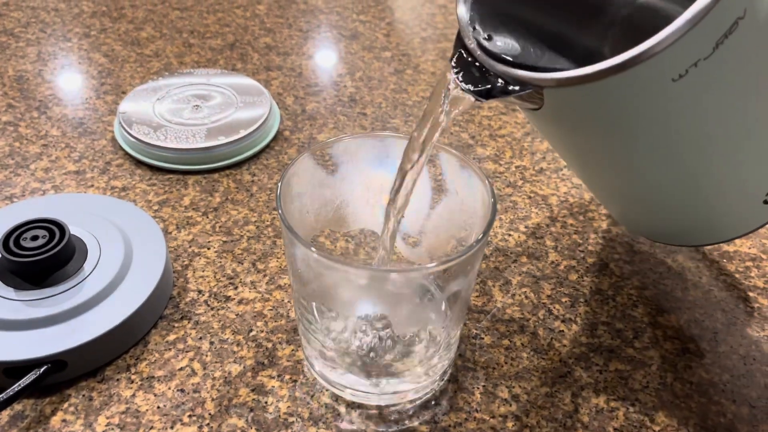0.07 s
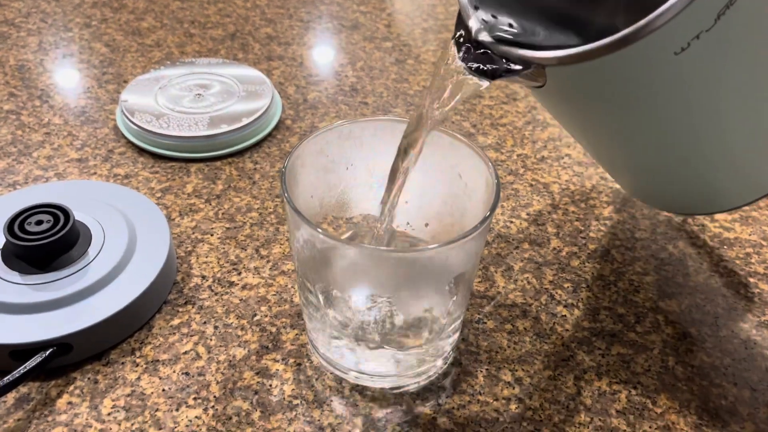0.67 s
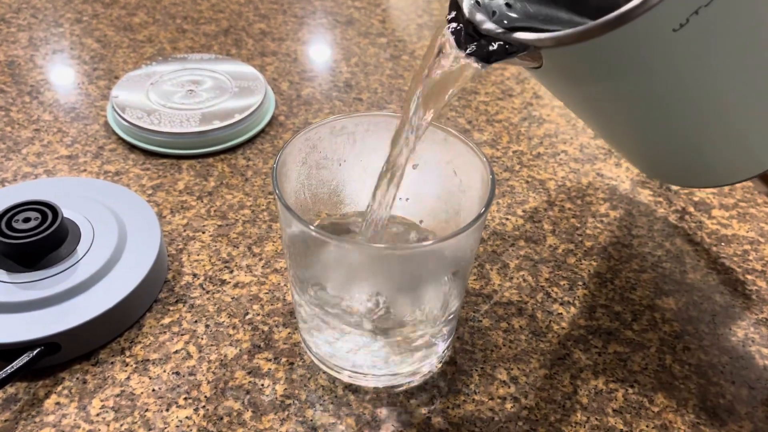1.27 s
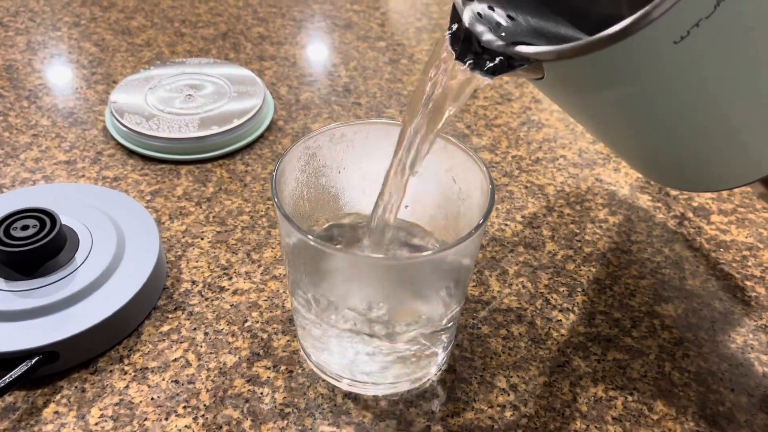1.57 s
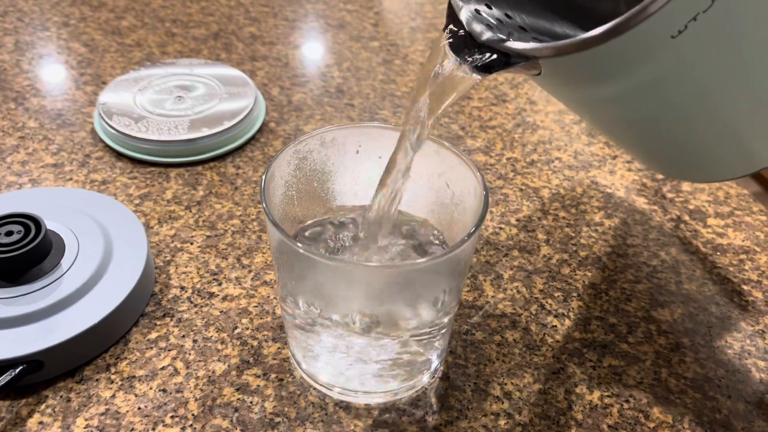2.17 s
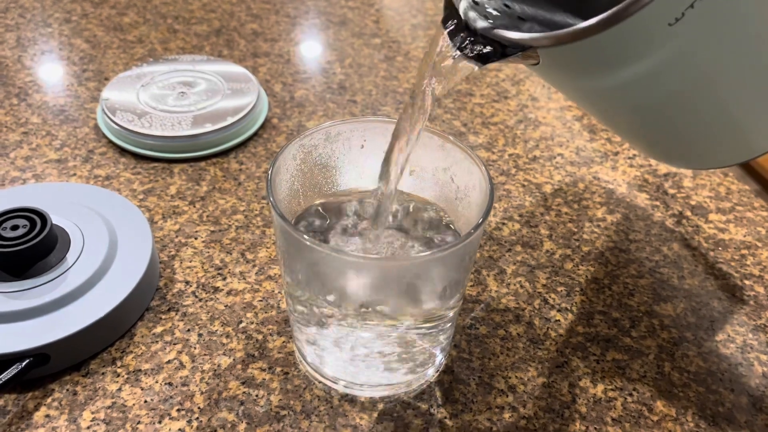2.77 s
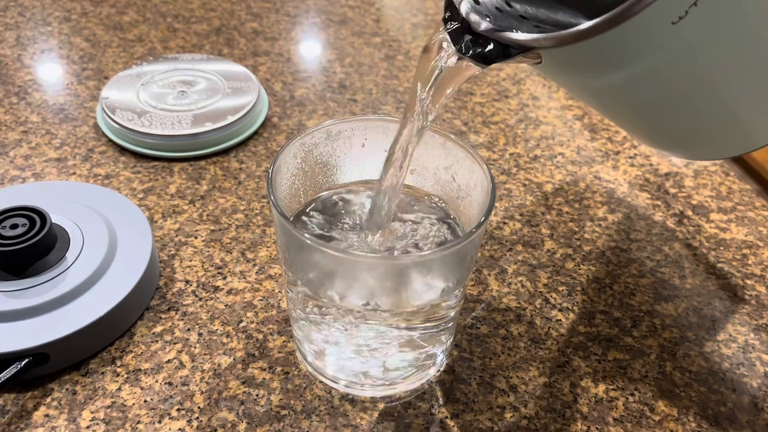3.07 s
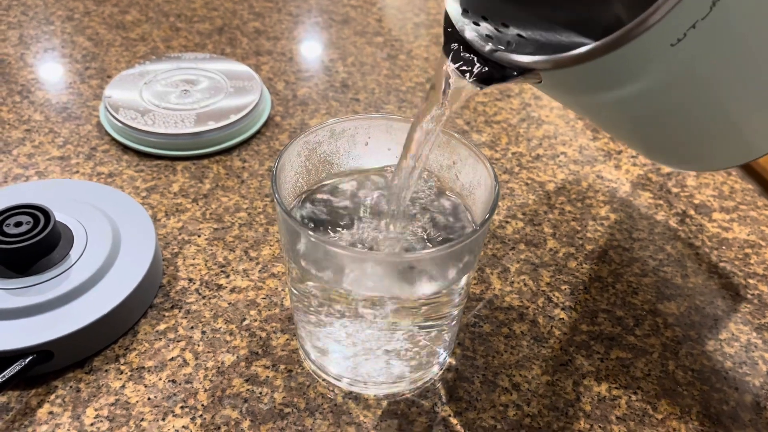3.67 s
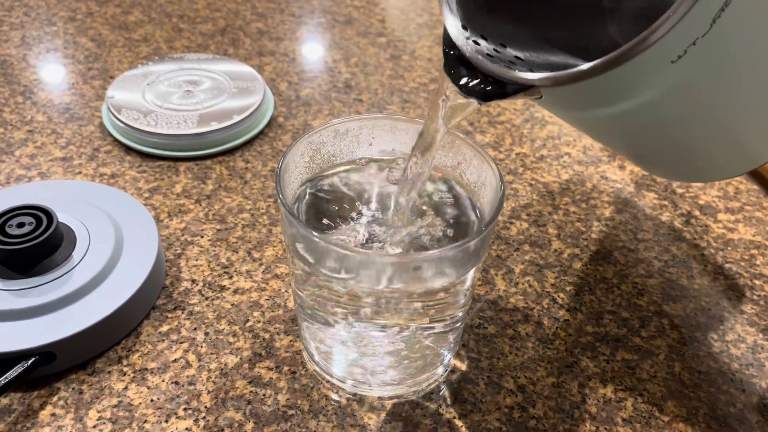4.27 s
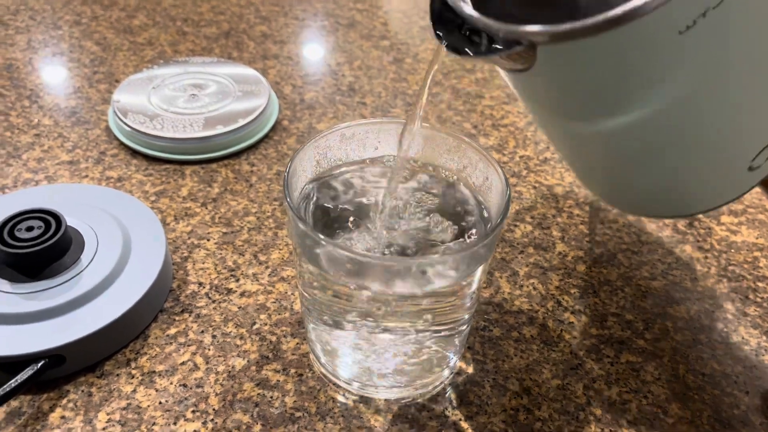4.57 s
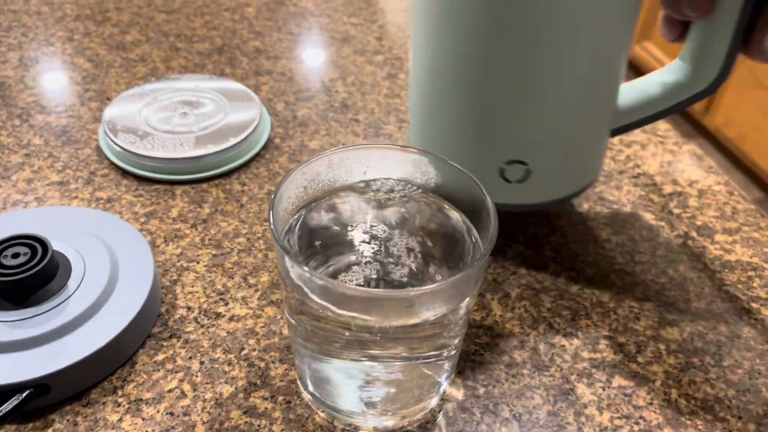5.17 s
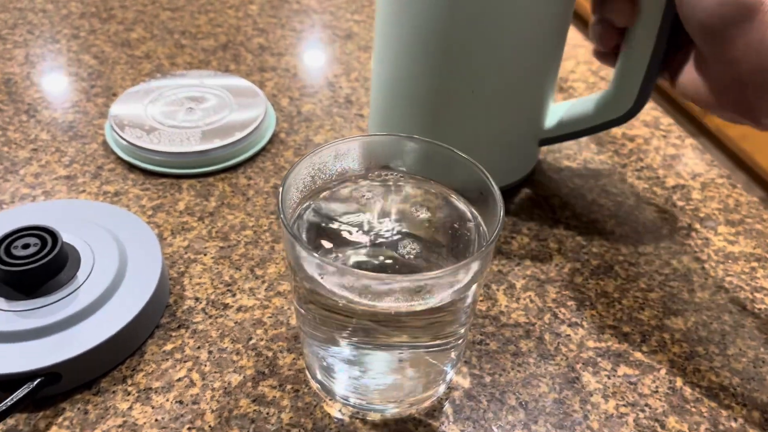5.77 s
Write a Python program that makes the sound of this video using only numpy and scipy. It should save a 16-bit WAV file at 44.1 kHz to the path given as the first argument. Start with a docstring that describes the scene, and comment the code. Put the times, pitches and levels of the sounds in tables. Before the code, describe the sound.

In a kitchen with a low hum, a close stream of hot water gurgles into a glass, with small plops, ticking droplets and a brief fizz. The pitch climbs while the flow weakens and stops. Faint steam whistles as the kettle is tilted upright. A little farther back, it is set on the stone counter with a ringing double knock, followed by a low slosh and a soft sizzle on hot metal.

```python
"""Hot water runs from an electric kettle into a glass tumbler, close by on a kitchen counter.
First the full stream pulls air under: pockets plop, bubbles patter, spray ticks, and the air column
rises in pitch as the glass fills. After 2 s foam fizzes up; the stream then thins to spurts and drips.
Past 4 s the kettle tips back with a slosh and thin whistles of steam. At 5.4 s it lands and rocks,
and the water left inside sloshes and sizzles on the hot metal. A low room hum lies under it all."""
import sys
import numpy as np
from scipy import signal
from scipy.fft import rfft, irfft
from scipy.io import wavfile

SR = 44100
rng = np.random.default_rng(int(sys.argv[2]) if len(sys.argv) > 2 else 0)


def dump(signal):
    """Clip the signal to [-1, 1] and save it as 16-bit WAV at the path in sys.argv[1]."""
    limited = np.clip(np.atleast_2d(signal).T, -1, 1)
    pcm = np.round(limited * 32767).astype(np.int16)
    wavfile.write(sys.argv[1], SR, pcm)


N = 264908
TIME, HZ = np.arange(N) / SR, np.fft.rfftfreq(N, 1 / SR)

# The featured air pockets pulled under by the stream: start_s, level_db, pitch_hz, t60_s
AIR_POCKETS = [(0.0213, -26, 1004, 0.051), (0.0508, -22.5, 2430, 0.0088), (0.1989, -14, 960, 0.028),
               (0.2309, -17.5, 970, 0.019), (0.2604, -21, 980, 0.029), (0.3481, -25, 1020, 0.023),
               (0.385, -12.5, 1010, 0.0043), (0.5085, -15, 945, 0.033), (0.4069, -18.5, 970, 0.031),
               (0.4711, -15.5, 934, .038), (0.517, -13, 928, 0.025), (0.5876, -17.5, 930, 0.0093),
               (0.6781, -9, 935, 0.0076), (0.701, -15, 1000, 0.014), (0.7284, -10.5, 940, 0.026),
               (0.7902, -17.5, 850, .011), (0.8137, -14, 486, 0.0067), (0.8368, -21.5, 970, 0.025),
               (0.8763, -8.5, 546, 0.0033), (0.9926, -17.5, 630, 0.0061), (1.0788, -11.5, 565, 0.0047),
               (1.092, -9, 487, 0.0034), (1.1118, -10, 690, 0.0067), (1.1592, -7.5, 463, 0.0061),
               (1.261, -8.5, 393, 0.0096), (1.3474, -10.5, 420, .014), (1.3628, -10.5, 516, 0.012),
               (1.4001, -11.5, 455, 0.006), (1.4673, -15.5, 370, 0.0093), (1.571, -16.5, 394, 0.018),
               (1.5987, -16.5, 1270, 0.0069), (1.483, -18.5, 1300, 0.0065), (1.5259, -21, 490, 0.019),
               (1.6255, -27, 1440, 0.0038), (1.752, -18.5, 1340, 0.0065), (1.8492, -16.5, 1340, 0.0042),
               (1.9461, -18, 1240, .005), (2.0614, -12, 1170, 0.0048), (2.123, -3, 3680, 0.001),
               (2.1514, -12.5, 1240, 0.0015), (2.1783, -13.5, 1140, 0.0029), (2.212, -20.5, 362, 0.012),
               (2.3174, -9, 1230, .003), (2.5304, -14.5, 3320, 0.0025), (2.5931, -24, 2240, 0.0035),
               (2.716, -21.5, 1300, 0.0039), (2.8826, -25, 1400, 0.021), (2.9377, -24.5, 1740, 0.02),
               (2.9477, -19, 1330, 0.011), (3.2345, -15, 1310, 0.0026), (3.261, -17, 1460, 0.0028),
               (3.4558, -18, 1290, 0.0022), (3.5946, -25, 1650, 0.0043), (3.854, -28.5, 1400, 0.0078),
               (4.2319, -36, 1820, .013), (4.3956, -28.5, 1730, .01), (4.587, -15, 1510, 0.0032),
               (4.6193, -22.5, 3780, 0.0037), (4.649, -21, 1490, 0.0072), (4.6836, -26, 2630, 0.0057)]
# The stream runs full, thins and stops: time_s, bubbling_db, spray_db
POUR_LEVELS = [(0, -52, -52.5), (0.6, -53, -54), (1.2, -52, -60.5), (1.7, -51, -63.5), (2.2, -51, -65),
               (2.6, -59, -60.5), (3.3, -58, -60.5), (4.1, -72, -59.5), (4.68, -59.5, -62),
               (4.76, -87, -66), (5.38, -76, -67)]
# Spurts in the thinning stream: start_s, end_s, boost_db
STREAM_SPURTS = [(2.783, 3.019, 7.5), (3.156, 3.242, 6), (3.504, 3.687, 10), (3.824, 3.913, 11),
                 (4.294, 4.406, 9), (4.58, 4.712, 6)]
# The air column above the water: time_s, pitch_hz, width_hz, gulps_over_column_db
AIR_COLUMN = [(0, 1013, 102, -24.5), (.8, 976, 127, -15.5), (1.1, 1020, 345, 5.5), (1.5, 1310, 355, 0),
              (2.25, 1370, 317, 2), (2.7, 1485, 363, -11), (3.7, 1580, 364, -9), (4.7, 1810, 286, -12),
              (5.4, 1610, 200, -2)]
# The featured droplets and bursting films: time_s, level_db, brightness_db
DROPLETS = [(0.175, -37.5, -7), (0.3385, -28.5, -12), (0.48, -34.5, -10), (0.578, -29, -17),
            (0.6755, -34, -45), (0.7007, -32, -5.5), (0.763, -29, -19), (0.9025, -32, -18),
            (1.043, -36, -1), (1.153, -42.5, 6), (1.261, -41, -11), (1.346, -35.5, -2), (1.4423, -36.5, -2),
            (1.6313, -42, 0), (2.061, -34.5, -9), (2.117, -33, 1), (2.151, -38.5, -1), (2.2632, -41.5, 4),
            (2.947, -39, 2), (3.259, -31.5, -8), (3.9504, -41.5, -14), (4.5121, -39, -3),
            (4.6427, -32.5, 5), (4.6775, -36, 5.5), (5.169, -44.5, -10)]
# Tone of a pocket's slap, impacts on the water, a droplet and fine spray: frequency_hz, gain_db
SLAP_EQ = [(500, -16), (1400, 13.5), (2200, 6.5), (3400, 1), (4800, -2.5), (6500, -3.5), (16000, -10.5)]
IMPACT_EQ = [(200, -29), (600, -10), (1000, 0), (2000, 5), (5000, -3)]
DROPLET_EQ = [(900, -30), (2500, -9), (5000, -7), (6800, 3.5), (8300, 6.5), (10000, 1.5), (12000, -0.5),
              (15500, 2.5), (17000, -25)]
SPRAY_EQ = [(2500, -19), (5000, 2), (6800, 10), (8300, -31), (10500, 4.5), (12500, -11), (15500, -3),
            (17000, -18)]
# The kettle lands and rocks: start_s, kettle_db, slab_db, cabinet_db, crack_db, contact_ms
LANDING_HITS = [(5.412, -10, 0.5, -56, -16, 0.11), (5.4903, 3.5, -33, -17.5, -16.5, 0.74),
                (5.5146, -31, -22, -27, -31, 0.11), (5.5257, -18, -7.5, -23.5, -27, 0.33)]
# Modes of the kettle and of the cabinet under the counter: pitch_hz, level_db, t60_s
KETTLE_MODES = [(321.5, -4.5, .12), (410, 2.5, 0.079), (468, -5.5, 0.044), (587, -4, 0.056),
                (613, -17, 0.14), (695, -5, 0.036), (865, -6.5, 0.034), (962, -17.5, 0.19),
                (1085, -16, 0.14), (1290, -22, 0.16), (1460, -16, 0.077), (1560, -2.5, 0.033),
                (1628, -21, .24), (2130, -9, 0.019), (2720, -24, 0.017), (3540, -20, 0.03),
                (4540, -26, .025)]
CABINET_MODES = [(103, 9, 0.091), (114.4, 0, 0.25), (164, -4.5, 0.43), (246, 1, 0.17)]
# Water sizzling and sloshing in the kettle: start_s, end_s, level_db, fade_s
SIZZLE_CUES = [(4.25, 5.06, -65.5, 0.13), (5.745, 6.1, -54, 0.12), (5.757, 5.768, -36, 0.022),
               (5.783, 5.799, -38, 0.024)]
SLOSH_CUES = [(4.135, 4.264, -45, 0.028), (5.73, 6.1, -40, 0.1)]
# Thin whistles of steam: start_s, end_s, first_hz, last_hz, width_hz, level_db
STEAM_CUES = [(4.2, 4.65, 4500, 4450, 650, -67), (4.62, 4.92, 4650, 4500, 200, -65),
              (4.5, 5.08, 4250, 4200, 900, -65), (4.92, 5.02, 7850, 7450, 140, -67),
              (5.66, 6.1, 6600, 6650, 400, -62), (5.8, 6.1, 4050, 4080, 350, -62)]
# Tone of the base's crack on stone, the sizzle and the slosh: frequency_hz, gain_db
CRACK_EQ = [(300, 17), (800, 20), (1300, 7.5), (1600, 13.5), (1850, -1.5), (2080, 4.5), (2380, -5.5),
            (2700, -1.5), (3100, -10), (3500, -2.5), (4800, -12), (6300, -20), (8200, -18.5),
            (11000, -31.5), (16000, -27)]
SIZZLE_EQ = [(300, 1), (900, -2), (1500, -0.5), (2300, -3), (3200, -2), (4200, -3.5), (5500, -8.5),
             (9000, -9), (11200, -4.5), (12500, -27), (16000, -21)]
SLOSH_EQ = [(30, -10), (60, -19), (115, 6), (175, -3), (240, -8), (420, -11.5), (520, -23.5), (900, -30),
            (2000, -58)]
# Stereo phase of a close source, at a depth of 1: frequency_hz, left_lead_rad
STEREO_PHASE = [(100, 0.35), (400, 0.65), (780, 0.42), (1120, 1.0), (1460, 0.72), (3360, 0.42), (4310, 1.5),
                (5000, -2.3), (5860, -2), (7920, -5.5), (10200, -6.5), (12600, -10), (15200, -11),
                (16500, -11)]
# Stereo balance of a close source, at a depth of 1: frequency_hz, left_minus_right_db
STEREO_BALANCE = [(100, -5), (400, 2.5), (700, 5), (1050, 0.5), (1300, 7), (2200, 0), (3200, 5), (4300, 6),
                  (7000, 1.5), (9000, -1), (15000, 0.5)]
# Decay of the kitchen's reflections: frequency_hz, t60_s
REVERB_DECAY = [(100, 0.68), (400, 0.53), (1500, 0.48), (4000, 0.47), (10000, 0.15), (16000, 0.077)]
# Tone of the reflections and of the background rumble: frequency_hz, gain_db
REVERB_EQ = [(60, 8.5), (160, -6.5), (205, -5), (270, -1.5), (400, -4), (650, -3), (4000, 3), (16000, 3.5)]
RUMBLE_EQ = [(20, -17.5), (40, -5), (62, 3), (100, 2), (130, -3.5), (165, -7), (260, -15), (400, -23),
             (700, -32), (1200, -37), (1450, -26), (1630, -22.5), (1900, -52), (6000, -42), (16000, -54)]

FOAM_START_S, FOAM_END_S = 2.11, 2.67


def plops(birth_over_column=1.425, slap_db=-20, soften_db_per_s=250):
    """Each air pocket slaps, rings and bends up in pitch as it rises; long rings start softly."""
    out, column_hz = np.zeros(N), curves(AIR_COLUMN)[0]
    for start, db, hz, t60 in list(AIR_POCKETS) + small_pockets():
        birth = max(birth_over_column * column_hz[round(start * SR)] / hz, 1)
        add(out, start, amp(db) * glide(hz, t60, birth, climb_per_s=19))
        puff = burst(snap_s=0.00066, tail_db=-17.5, tail_s=0.0085, lead_s=0.0016, eq=SLAP_EQ)
        add(out, start - 0.003, amp(slap_db + 0.82 * db - soften_db_per_s * t60) * puff)
    return out


def small_pockets(per_s=26, over_db=24, scatter_db=4, scatter_octaves=0.14):
    """Cues for weaker pockets: randomly timed, as strong as the stream, tuned near the air column."""
    level_db, (hz, width, _) = bubbling_db(), curves(AIR_COLUMN)
    jitter = rng.uniform(-1, 1, (N // 100, 2))
    onsets = np.flatnonzero(rng.random(N) < per_s / SR)
    return [(i / SR, level_db[i] + over_db + scatter_db * accent,
             0.94 * hz[i] * 2 ** (scatter_octaves * detune), 2.03 / width[i])
            for i, (accent, detune) in zip(onsets, jitter)]


def bubbling_db():
    """How hard the stream stirs the water: its steady flow plus the spurts."""
    spurts_db = sum(db * swell(start, end, fade_s=0.031) for start, end, db in STREAM_SPURTS)
    return curves(POUR_LEVELS)[0] + spurts_db


def churn(body_db=11.5, cushion_db_per_s=2.5, patter_db=-1, surge_db=4, thinning=0.6):
    """Impacts ring the air column; bubbles gulp, patter and fizz, surging as the stream wobbles."""
    hz, width, gulp_db = curves(AIR_COLUMN)
    flow_db = curves(POUR_LEVELS)[0]
    density = np.maximum(amp(thinning * (flow_db - flow_db.max())), 0.2)  # less flow, fewer bubbles
    impacts = equalise(clicks(per_s=520 * density, spread_db=5.5), IMPACT_EQ)
    column = unit_rms(resonate(impacts, hz, width))
    gulps = swarm(hz=467, octaves=0.86, cycles=7.4, birth=2.66, per_s=300 * density, spread_db=3.5)
    patter = swarm(hz=1990, octaves=0.35, cycles=23, birth=1.46, per_s=260 * density, spread_db=5)
    fizz = swarm(hz=3650, octaves=0.37, cycles=30, birth=1.12, per_s=330 * density, spread_db=5)
    body = (column + amp(gulp_db) * gulps) / np.hypot(1, amp(gulp_db))
    body *= amp(body_db - cushion_db_per_s * TIME)  # deepening water cushions the stream
    fizz_db = np.where(TIME < FOAM_END_S, -7.5, -10)
    surges = unit_rms(amp(surge_db * drift(per_s=23.3)))
    level = surges * amp(bubbling_db()) * np.sqrt(density.mean() / density)
    return level * (body + amp(patter_db) * patter + amp(fizz_db) * fizz)


def foam(first_hz=3480, last_hz=4400, level_db=-51):
    """For half a second the stream whips in ever smaller bubbles, so the fizz rises in pitch."""
    progress = np.clip((TIME - FOAM_START_S) / (FOAM_END_S - FOAM_START_S), 0, 1)
    hz = first_hz + (last_hz - first_hz) * progress ** 3
    fizz = swarm(hz, octaves=0.2, cycles=20, birth=1.12, per_s=160, spread_db=0.5)
    return amp(level_db) * swell(FOAM_START_S, FOAM_END_S, fade_s=0.013) * fizz


def swarm(hz, octaves, cycles, birth, per_s, spread_db):
    """Small bubbles scattered in pitch about hz, each dying by 60 dB over the given cycles."""
    out, strikes = np.zeros(N), clicks(per_s, spread_db)
    log_pitch = np.log2(hz) + octaves * rng.uniform(-1.2, 1, N)
    palette = np.linspace(log_pitch.min(), log_pitch.max(), 28)
    bubbles = [glide(pitch, cycles / pitch, birth, climb_per_s=18, samples=900) for pitch in 2 ** palette]
    for i in np.flatnonzero(strikes):
        nearest = np.argmin(abs(palette - log_pitch[i]))
        add(out, i / SR, strikes[i] * bubbles[nearest])
    return unit_rms(out)


def spray(tick_db=5, mist_db=4, hiss_gain=0.17):
    """Droplets tick sharply over a bed of fine crackle and hiss."""
    out = np.zeros(N)
    for time_s, db, brightness_db in DROPLETS:
        gain = amp(db + tick_db) * np.hypot(1, amp(brightness_db))
        add(out, time_s - 0.0032, gain * tick(brightness_db))
    crackle = sum(signal.oaconvolve(clicks(per_s=13, spread_db=7), tick(brightness_db))[:N]
                  for brightness_db in np.linspace(-22, 8, 14))
    mist = unit_rms(crackle) + hiss_gain * equalise(rng.standard_normal(N), SPRAY_EQ)
    return out + amp(curves(POUR_LEVELS)[1] + mist_db) * mist


def tick(brightness_db):
    """One water film tears; the thinner it is, the brighter its top octave."""
    eq = [(hz, db + (brightness_db + 6) * np.clip((hz - 9000) / 4500, 0, 1)) for hz, db in DROPLET_EQ]
    return burst(snap_s=0.0005, tail_db=-13, tail_s=0.004, lead_s=0.00019, eq=eq)


def kettle_landing():
    """The base cracks on the stone: the slab thuds, the kettle rings and the cabinet booms."""
    out = np.zeros(N)
    # Bending waves in the slab arrive high notes first.
    thud = glide(hz=95, t60=0.067, birth=7.13, settle_s=0.00454, samples=13000)
    for start, kettle_db, slab_db, cabinet_db, crack_db, contact_ms in LANDING_HITS:
        add(out, start, amp(slab_db) * thud)
        add(out, start + 0.00045, amp(kettle_db) * ring(KETTLE_MODES, contact_ms, rise_s=0.0039))
        add(out, start + 0.001, amp(cabinet_db) * ring(CABINET_MODES, contact_ms=0.82, rise_s=0.0066))
        crack = burst(snap_s=0.0023, tail_db=-33, tail_s=0.0096, lead_s=0.0001, eq=CRACK_EQ)
        add(out, start - 0.003, amp(crack_db + 11) * crack)
    return signal.sosfilt(signal.butter(3, 58, "high", fs=SR, output="sos"), out)


def ring(modes, contact_ms, rise_s):
    """A struck body rings in damped modes; a longer contact dulls the high ones."""
    t, out = np.arange(SR) / SR, np.zeros(SR)
    for hz, db, t60 in modes:
        dulling = np.hypot(1, 2 * np.pi * hz * contact_ms / 1000)
        out += amp(db - 60 * t / t60) * np.sin(2 * np.pi * hz * t) / dulling
    return out * (1 - np.exp(-t / rise_s))


def slosh():
    """Water rolls in the kettle as it tips back, and again after it lands."""
    return fader(SLOSH_CUES) * stereo_noise(SLOSH_EQ, side_db=-16)


def steam():
    """Escaping steam whistles fitfully in narrow, gliding bands of noise."""
    out = np.zeros((2, N))
    for start, end, first_hz, last_hz, width_hz, db in STEAM_CUES:
        n = round((end - start) * SR)
        breath = rng.standard_normal((3, n)) + 1j * rng.standard_normal((3, n))
        flutter = signal.sosfilt(signal.butter(2, width_hz / 2, fs=SR, output="sos"), breath)
        carrier = np.exp(2j * np.pi * np.cumsum(np.linspace(first_hz, last_hz, n)) / SR)
        centre, *sides = unit_rms((flutter * carrier).real)
        for channel, side in zip(out, sides):
            add(channel, start, amp(db) * unit_rms(centre + side) * signal.windows.tukey(n, 0.3))
    fits = unit_rms(amp(2.5 * drift(per_s=22)))
    return fits * out


def sizzle():
    """Water left in the kettle spits on the hot metal in a wide hiss."""
    return fader(SIZZLE_CUES) * stereo_noise(SIZZLE_EQ, side_db=0.5)


def reverb(x, gap_s=0.0028, mono_below_hz=700):
    """Dense kitchen reflections, each band dying at its own speed; the bass stays centred."""
    taps = rng.standard_normal((2, SR)) * (rng.random((2, SR)) < 0.1)
    hz, t, (left, right) = signal.stft(taps, SR, nperseg=512)
    hz = hz[:, None]
    shared = np.exp(-(hz / mono_below_hz) ** 2 / 2)
    bands = np.array([left, shared * left + np.sqrt(1 - shared ** 2) * right])
    bands *= amp(lookup(REVERB_EQ, hz) - 60 * t / lookup(REVERB_DECAY, hz))
    tail = signal.istft(bands, SR, nperseg=512)[1]
    tail *= np.clip(np.arange(tail.shape[1]) / SR / gap_s - 1, 0, 1)  # pre-delay, then fade in
    return signal.fftconvolve(x[None], tail / np.linalg.norm(tail[0]), axes=1)[:, :N]


def room_tone(hum_hz=118.2, hum_db=-53, rumble_db=-47.5, waver_rad=0.8):
    """Low kitchen rumble and a wavering hum, leaning slightly left."""
    hum = np.sqrt(2) * np.sin(2 * np.pi * hum_hz * TIME + waver_rad * drift(per_s=3.3))
    rumble = stereo_noise(RUMBLE_EQ, side_db=-17)
    return (amp(rumble_db) * rumble + amp(hum_db) * hum) * amp([[0.8], [-0.8]])


def glide(hz, t60, birth, settle_s=0.00053, climb_per_s=0, samples=2205):
    """A dying tone that starts at birth times hz, drops quickly towards hz, and may then climb."""
    t = np.arange(samples) / SR
    drop = (birth - 1) * settle_s * (1 - np.exp(-t / settle_s))
    turns = hz * (t + drop + climb_per_s * t * t / 2)
    attack = 1 - np.exp(-3 * hz * t)
    return np.sin(2 * np.pi * turns) * attack * amp(-60 * t / t60)


def burst(snap_s, tail_db, tail_s, lead_s, eq):
    """A puff of noise that peaks 3 ms in, with the energy of one millisecond at rms 1."""
    t = np.arange(SR // 50) / SR - 0.003
    decay = np.exp(-abs(t) / snap_s) + amp(tail_db) * np.exp(-abs(t) / tail_s)
    envelope = np.where(t < 0, np.exp(-abs(t) / lead_s), decay)
    puff = equalise(rng.choice([-1, 1], len(t)) * envelope, eq)
    return puff / np.sqrt(np.sum(puff ** 2) / (SR / 1000))


def resonate(x, hz, width_hz):
    """A swept resonance that keeps its noise power steady."""
    carrier = np.exp(2j * np.pi * np.cumsum(hz) / SR)
    out, state = np.zeros(N, complex), np.zeros(1, complex)
    for block in np.array_split(np.arange(N), N // 2048):
        pole = np.exp(-np.pi * width_hz[block[0]] / SR)
        gain = np.sqrt(1 - pole ** 2)
        out[block], state = signal.lfilter([gain], [1, -pole], x[block] / carrier[block], zi=state)
    return (carrier * out).imag


def clicks(per_s, spread_db):
    """Random impulses, many small and a few large."""
    size = amp(spread_db * np.minimum(rng.exponential(1, N), np.pi))
    return size * rng.choice([-1, 1], N) * (rng.random(N) < per_s / SR)


def stereo_noise(eq, side_db):
    """Mid/side noise; side_db sets the width."""
    mid, side = equalise(rng.standard_normal((2, N)), eq)
    return unit_rms(np.array([mid + amp(side_db) * side, mid - amp(side_db) * side]))


def place(x, phase_depth, balance_depth):
    """A close source reaches left and right with different phase and level."""
    phase = phase_depth * lookup(STEREO_PHASE, HZ)
    balance_db = balance_depth * lookup(STEREO_BALANCE, HZ)
    left = amp(balance_db / 2) * np.exp(0.5j * phase)
    return irfft(rfft(x) * np.array([left, 1 / left]), N)


def drift(per_s):
    """A slow random wander of rms 1."""
    return equalise(rng.standard_normal(N), [(1, 0), (per_s, -3), (2 * per_s, -24), (10 * per_s, -90)])


def swell(start, end, fade_s):
    """Fades in around start, holds at 1, and fades out around end."""
    return np.clip(np.minimum(TIME - start, end - TIME) / fade_s + 0.5, 0, 1)


def fader(cues):
    """A gain curve with one swell for each cue."""
    return sum(amp(db) * swell(start, end, fade_s) for start, end, db, fade_s in cues)


def curves(rows):
    """Each column of a time table as an automation curve."""
    times, *columns = np.transpose(rows)
    return [np.interp(TIME, times, column) for column in columns]


def equalise(x, eq):
    """Applies an EQ table and scales to rms 1."""
    hz = np.fft.rfftfreq(x.shape[-1], 1 / SR)
    return unit_rms(irfft(rfft(x) * amp(lookup(eq, hz)), x.shape[-1]))


def lookup(table, hz):
    """Reads a table on a log-frequency axis."""
    table_hz, values = np.transpose(table)
    return np.interp(np.log(hz + 1), np.log(table_hz + 1), values)


def add(mix, start_s, sound):
    """Mixes a sound in at start_s."""
    part = mix[max(round(start_s * SR), 0):][:len(sound)]
    part += sound[:len(part)]


def unit_rms(x):
    """Scales to rms 1."""
    return x / np.sqrt(np.mean(x ** 2) + 1e-20)


def amp(db):
    """Decibels to gain."""
    return 10 ** (np.asarray(db) / 20)


def scene(water_send_db=-15, landing_send_db=-10):
    """The glass is close and fairly dry; the kettle lands farther back, with more room on it."""
    water = plops() + churn() + foam() + spray()
    landing = kettle_landing()
    direct = place(water, phase_depth=0.96, balance_depth=1)
    direct += place(landing, phase_depth=0.87, balance_depth=0.13)
    reflections = amp(water_send_db) * reverb(water) + amp(landing_send_db) * reverb(landing)
    return direct + reflections + slosh() + steam() + sizzle() + room_tone()


def record(dry):
    """A steep high cut at 16.5 kHz on the whole mix."""
    high_cut = signal.firwin(255, 16500, window=("kaiser", 9), fs=SR)
    return signal.oaconvolve(dry, high_cut[None], "same")


dry = scene()
out = record(dry)
dump(out)
```